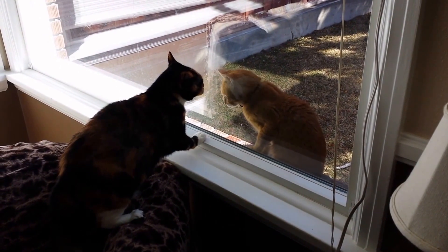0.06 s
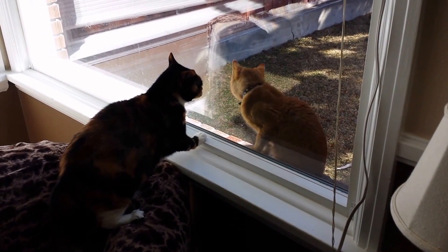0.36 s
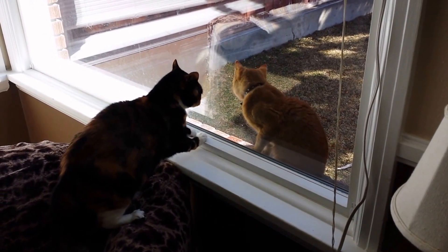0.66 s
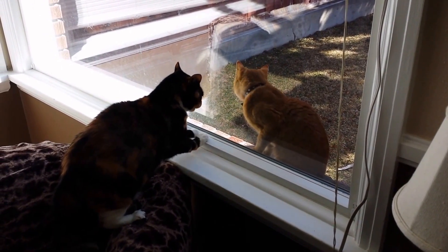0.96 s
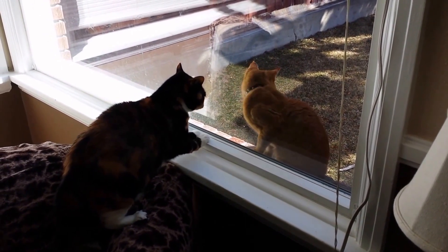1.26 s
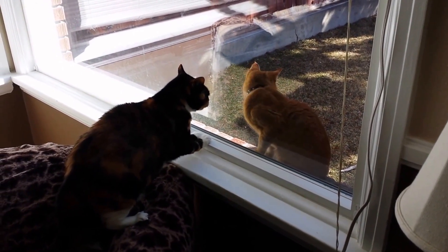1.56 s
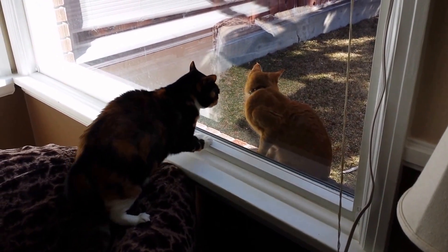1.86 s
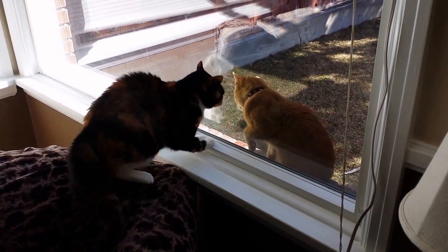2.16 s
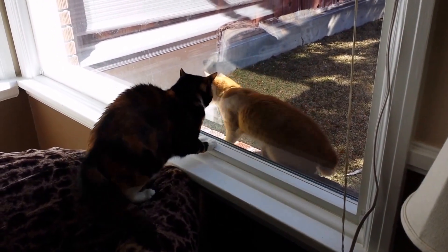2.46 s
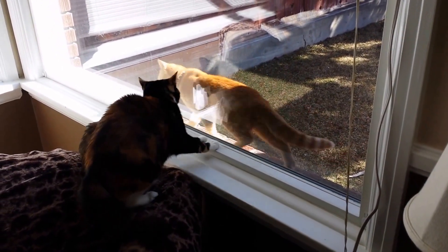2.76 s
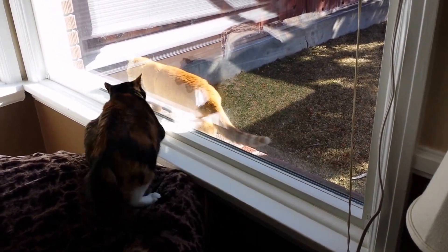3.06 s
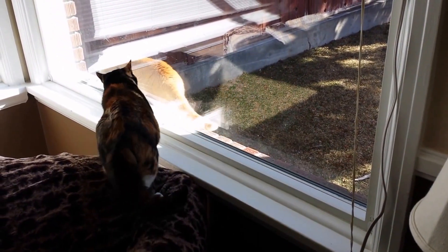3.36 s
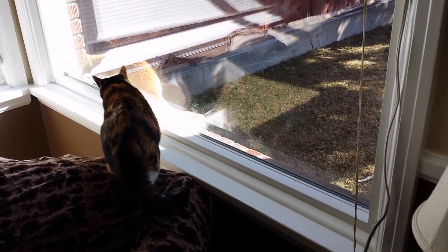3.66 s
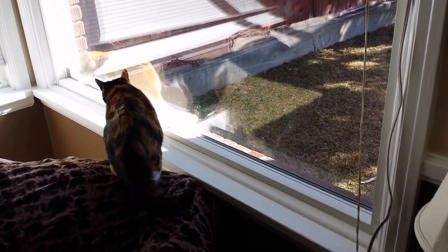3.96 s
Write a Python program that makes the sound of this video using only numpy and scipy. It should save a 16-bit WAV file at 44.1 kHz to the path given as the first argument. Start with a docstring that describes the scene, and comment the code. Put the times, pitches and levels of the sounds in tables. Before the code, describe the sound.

A cat growls low, then suddenly spits and hisses in a quiet room.

```python
"""On a window sill in a small room, a cat growls at another cat outside, shifts, then spits and hisses.
The growl is vocal-fold vibration with two strong harmonics, clean or ragged by turns. The spit is a
volley of pops as the tongue lets go; the hiss is turbulent air rushing through the open mouth.
Claws tick, paws bump and fur brushes a cushion, over room hiss, mains hum and a faint electronic whine."""
import sys
import numpy as np
from scipy import signal
from scipy.fft import rfft, irfft
from scipy.io import wavfile

SR = 44100
rng = np.random.default_rng(int(sys.argv[2]) if len(sys.argv) > 2 else 0)


def persist_wave(psi):
    """Save psi, clipped to +-1, as 16-bit WAV."""
    counts = np.round(np.clip(psi, -1, 1) * 32767).astype(np.int16)
    wavfile.write(sys.argv[1], SR, np.atleast_2d(counts).T)


N = 176400
T = np.arange(N) / SR

# stereo coherence of airy sounds: frequency_hz, coherence
AIR_COHERENCE = [(100, 1), (800, 1), (1100, 1), (2600, .15), (4000, 0.44), (4500, 1), (5400, 0.57),
                 (6400, 0.29), (8000, .35), (14000, .15)]
# their level difference: frequency_hz, left_minus_right_db
AIR_BALANCE = [(100, 0), (400, -1), (800, 3.5), (1400, 4.5), (2400, 0), (4200, -1), (5600, 4), (7500, -4),
               (9000, 0), (10500, -8.5), (14000, -8)]
# their phase difference: frequency_hz, left_lead_rad
AIR_LEAD = [(850, -0.36), (1300, -1.7), (2400, -2.3), (3500, 0.6), (4500, -0.96), (5600, -1.9),
            (6800, -2.5), (8000, -2.5), (9000, -2.5)]
# stereo coherence of room hiss and growl rasp: frequency_hz, coherence
DIFFUSE_COHERENCE = [(30, 0.77), (300, 0.81), (1000, 0.17), (3000, 0.067), (14000, 0.033)]


def growl():
    """Vocal folds oscillate behind a closed mouth; jitter, shimmer and throbbing make the tone rough."""
    # vibration rate of the folds: time_s, pitch_hz
    pitch = [(0, 303.2), (.1, 293.1), (.17, 312.7), (.22, 336.8), (.3, 316), (.36, 305), (.39, 277.4),
             (.44, 266.4), (.47, 240.7), (.5, 222.2), (.545, 203.7), (.6, 214.4), (.65, 216), (.72, 231.5),
             (.77, 225), (.82, 215.3), (.87, 227.1), (.91, 244.4), (.95, 256.3), (1.05, 261.3),
             (1.09, 243.3), (1.115, 204.6), (1.135, 172.9)]
    # irregularity of the cycles: time_s, roughness (0 to 1)
    roughness = [(0, .2), (.15, .24), (.22, .9), (.29, .4), (.41, .55), (.47, .2), (.53, .14), (.6, .19),
                 (.72, .17), (.86, .18), (.95, .5), (1.04, .35), (1.11, .25), (1.14, .5)]
    # strength of the voice: time_s, fundamental_db, second_harmonic_db
    effort = [(0, -43, -48.5), (.045, -41, -45), (.085, -56, -50.5), (.12, -49, -45), (.145, -42, -50),
              (.18, -48, -54), (.215, -41.5, -68), (.25, -50, -55), (.28, -39.5, -54), (.35, -47, -52.5),
              (.4, -41, -51.5), (.44, -40.5, -52.5), (.48, -36, -36), (.53, -33, -31.5), (.59, -35, -32),
              (.625, -38, -36), (.66, -48, -35), (.69, -32, -34.5), (.745, -36, -37.5), (.77, -39, -30),
              (.79, -33.5, -40.5), (.82, -38, -31), (.885, -34, -39.5), (.915, -43.5, -43.5),
              (.945, -35, -49), (.97, -47.5, -51.5), (1.02, -41.5, -43.5), (1.055, -47, -44.5),
              (1.075, -44, -50.5), (1.11, -40, -41), (1.135, -47.5, -57.5)]
    # weak upper partials: harmonic_number, level_db (relative to the second harmonic)
    overtones = [(3, -22), (4, -35.5), (5, -61), (7, -44)]
    # air in the voice: frequency_hz, density_db
    rasp_spectrum = [(60, -30), (120, -29), (170, -19), (290, -11), (385, 6.5), (520, 3), (720, -11),
                     (860, -22), (1200, -17), (1700, -42), (4000, -44)]
    # breath through the nose: time_s, level_db
    nose_level = [(0, -75), (.17, -65.5), (.22, -59), (.33, -70), (.46, -72), (.56, -58.5), (.66, -53.5),
                  (.78, -58), (.9, -58), (1.05, -60), (1.18, -62.5), (1.25, -69), (1.32, -120)]
    # its spectrum: frequency_hz, density_db
    nose_spectrum = [(500, 1), (1050, -1.5), (1300, -4), (1490, 5.5), (1680, -9), (1900, -9), (2300, -6),
                     (3300, -13.5), (3900, -7), (4800, -18), (5450, -7.5), (7300, -13), (10000, -24),
                     (14500, -35)]
    jitter, shimmer, shimmer_hz = .045, 0.84, 73
    throb_hz, throb_depth, release_db_per_s = 52.24, 0.93, 183
    rough = np.clip(curve(roughness), 0, 1)
    phase = running_phase(curve(pitch) * (1 + jitter * rough * wander(hz=110)))
    throb_phase = running_phase(throb_hz * (1 + 0.288 * wander(hz=24.9)))
    throb = 1 + throb_depth * rough * np.sin(throb_phase)
    gate = throb * amp(-release_db_per_s * np.maximum(T - effort[-1][0], 0))
    first, second = amp(curve(effort)), amp(curve(effort, column=2))
    harmonics = [(1, first), (2, second)] + [(round(k), second * amp(db)) for k, db in overtones]
    shared_flutter, voice = wander(shimmer_hz), np.zeros(N)
    for k, level in harmonics:
        # complex flutter disturbs both amplitude and phase
        flutter = 0.6 * shared_flutter + 0.67 * (wander(shimmer_hz) + 1j * wander(shimmer_hz))
        modulation = 1 - rough ** 2 / 2 + shimmer * rough * flutter
        voice += level * (np.exp(1j * k * phase) * modulation).imag
    rasp_gain = amp(-9) * np.hypot(first, second) * gate * (0.36 + rough)
    rasp = noise(rasp_spectrum, DIFFUSE_COHERENCE) * rasp_gain
    breath = noise(nose_spectrum) * amp(curve(nose_level)) * (1 + 0.25 * np.cos(phase))
    return room(gate * np.sqrt(2) * voice * amp([[.2], [-.1]]) + rasp + breath, wet_db=-11)


def hiss():
    """Turbulent airflow excites resonances of the throat and open mouth; the throat band flutters."""
    # relative levels of three noise bands: time_s, treble_db, throat_db, middle_db
    levels = [(2.84, -77, -73, -82), (2.88, -56, -74, -69), (2.905, -52.5, -79, -50), (2.93, -50, -54, -61),
              (2.965, -44.5, -61, -48.5), (3.02, -48.5, -61, -53.5), (3.065, -45, -48, -49),
              (3.15, -40.5, -43.5, -46), (3.29, -38, -40, -44), (3.32, -38, -44.5, -44.5),
              (3.455, -38.5, -53, -44.5), (3.51, -52, -59.5, -55), (3.56, -61, -71, -68),
              (3.62, -81, -92, -93)]
    # spectra of those bands: frequency_hz, density_db
    treble_spectrum = [(2500, -32), (3300, -15.5), (4700, -11.5), (5100, -6), (5380, 4), (5800, 4),
                       (6150, 1), (6600, 0.5), (7100, -3.5), (8100, -4.5), (8800, -11.5), (10000, -18),
                       (12300, -22.5), (14500, -50)]
    throat_spectrum = [(70, -71), (170, -15.5), (290, -6.5), (400, 2.5), (460, -2), (570, -5.5),
                       (740, -3.5), (870, -2.5), (960, -17), (1500, -34)]
    middle_spectrum = [(600, -5), (1000, -1), (1500, 2), (1900, -0.5), (2300, -3.5), (3100, -5.5),
                       (4000, -2.5), (6000, -26)]
    # mouth resonance, rising as the lips draw back: time_s, centre_hz
    formant = [(2.87, 3750), (3.0, 3850), (3.25, 4050), (3.46, 4250)]
    throat_hz = 446.5
    mouth, hum = noise([(1000, 0), (10000, 0)]), noise(throat_spectrum)
    for _ in range(2):  # two passes steepen the resonances
        mouth = resonate(mouth, curve(formant), width_hz=520)
        hum = resonate(hum, np.full(N, throat_hz), width_hz=70)
    treble = (noise(treble_spectrum) + amp(-11) * unit(mouth)) * amp(curve(levels) + 1)
    throat = noise(throat_spectrum) + amp(-3.5) * unit(hum)
    throat *= amp(curve(levels, column=2) - 1.5 + 1.3 * wander(hz=59.1))
    middle = noise(middle_spectrum) * amp(curve(levels, column=3) + 1.5)
    return room((treble + throat + middle) * amp(-2 + 0.34 * wander(hz=150)), wet_db=-5.5)


def spit():
    """Plosive release: the tongue lets go in a volley of wet pops, each a low puff and a bright spray."""
    # the pops: start_s, puff_db, spray_db
    volley = [(2.898, -37.5, -39), (2.907, -28.5, -38), (2.9104, -37, -21), (2.9135, -35.5, -25.5),
              (2.915, -54, -25.5), (2.9204, -28, -23.5)]
    # spectra of their two parts: frequency_hz, density_db
    puff_spectrum = [(100, -40), (330, -9), (600, -11), (900, 11.5), (1150, -3.5), (1550, 2), (2100, -20),
                     (4000, -6), (9000, -47)]
    spray_spectrum = [(800, -21.5), (2400, -0.5), (3700, -15.5), (4500, -17), (5200, 3.5), (6500, -0.5),
                      (7300, -1.5), (7800, -5), (8400, -22), (11000, -35), (15000, -40)]
    puff = sum(amp(db) * burst(start, decay_s=0.0026) for start, db, _ in volley)
    spray = sum(amp(db) * burst(start, decay_s=0.0013) for start, _, db in volley)
    # saturation evens out the noise peaks, so each pop is dense
    pops = puff * np.tanh(noise(puff_spectrum)) + spray * np.tanh(noise(spray_spectrum))
    lowpass = signal.butter(4, 10700, fs=SR, output="sos")
    return room(signal.sosfilt(lowpass, pops), wet_db=-3)


def claw_ticks():
    """Stick and slip: a claw catches and lets go, giving a few bright, gritty cycles."""
    # the ticks: centre_s, level_db, ring_hz
    ticks = [(1.1878, -37.5, 5800), (1.197, -46, 6455), (1.2115, -50, 6340), (1.608, -54.5, 4000),
             (1.681, -55.5, 3600), (1.685, -43, 5600), (1.728, -45.5, 5400), (2.031, -25, 4820),
             (2.037, -50, 5500), (2.046, -44, 4460), (2.056, -40.5, 5430), (2.597, -55, 5100),
             (2.605, -54, 5050), (2.612, -51.5, 3550), (3.722, -53, 6500)]
    # their grit: frequency_hz, density_db
    grit_spectrum = [(1000, -22), (3400, -7.5), (4200, -3), (6400, 2.5), (7800, -12.5), (9500, -27.5),
                     (14500, -26)]
    width_s = 0.00051
    grit = 0.48 * noise(grit_spectrum)[0]
    out = np.zeros(N)
    for centre, db, hz in ticks:
        gaussian = np.exp(-np.minimum(((T - centre) / width_s) ** 2, 50))
        out += amp(db) * gaussian * (np.sin(2 * np.pi * hz * (T - centre)) + grit)
    return room(out * amp([[2], [-2.5]]), wet_db=1)


def paws_and_fur():
    """Damped impacts of paws on the sill, and friction noise of fur on the cushion."""
    # soft impacts: start_s, level_db
    impacts = [(0.198, -52.5), (2.032, -55.5), (2.042, -55), (2.058, -48), (2.188, -51.5), (2.611, -72),
               (2.646, -57), (2.679, -56.5)]
    # rustle as the cat shifts: time_s, relative_level_db
    rustle_level = [(1.58, -95.5), (1.64, -63.5), (1.69, -62), (1.745, -57.5), (1.79, -63), (1.86, -65.5),
                    (1.97, -74.5), (2.02, -73), (2.1, -63.5), (2.2, -72.5), (2.32, -87), (2.56, -78),
                    (2.61, -64), (2.66, -84), (2.76, -80), (3.5, -66), (3.6, -69.5), (3.68, -72.5),
                    (3.8, -69.5), (3.88, -64.5), (3.96, -64.5), (4, -69.5)]
    # spectra of impact and rustle: frequency_hz, density_db
    paw_spectrum = [(80, 2), (180, 4), (400, -10), (700, -1.5), (1000, -5), (1500, -5.5), (2100, -6.5),
                    (2700, -10.5), (4000, -12), (9000, -21)]
    fur_spectrum = [(200, 3.5), (850, -2), (1300, 6), (1550, 2), (1950, 2.5), (2400, 3), (2750, -3.5),
                    (3600, -4), (4800, -3.5), (5400, 3), (6700, -2), (8200, -3), (9500, -9), (14500, -20)]
    bumps = noise(paw_spectrum) * sum(amp(db) * burst(start, decay_s=0.0067) for start, db in impacts)
    return room(bumps, wet_db=0) + noise(fur_spectrum) * amp(curve(rustle_level) + 3 + wander(hz=118.9))


def background():
    """Broadband room hiss and the line spectra of mains hum and electronic whine swell and sink as one."""
    # room hiss: frequency_hz, density_db
    air_spectrum = [(20, 6), (45, -9), (65, 28), (100, 17), (170, 20.5), (250, 23), (400, 13.5), (750, 11),
                    (1200, 4.5), (2500, 1.5), (4500, 1.5), (6500, 4.5), (10000, 0), (14500, 2)]
    # envelope common to all three: time_s, level_db
    level = [(0, -53.5), (1.09, -53.5), (1.36, -64), (2.0, -62.5), (2.86, -62.5), (3.1, -55.5),
             (3.52, -57.5), (3.68, -62), (4, -61)]
    # mains hum: frequency_hz, relative_level_db
    hum_lines = [(62, -17), (120, -14), (241, -7.5), (360, -11.5)]
    # whine: harmonic_number, relative_level_db
    whine_lines = [(4, -14), (5, -16), (6, -19.5), (7, -22.5), (8, -26), (9, -57)]
    whine_hz, whine_end_s = 1512.7, 2.92
    hum = sum(amp(db) * np.sin(2 * np.pi * hz * T + 0.53 * wander(hz=1.3)) for hz, db in hum_lines)
    whine = np.zeros(N)
    for k, db in whine_lines:
        phase = 2 * np.pi * (round(k) * whine_hz * T + rng.random())
        whine += amp(db) * np.sin(phase + 0.81 * wander(hz=30.8))
    whine = whine * np.clip((whine_end_s - T) / .05, 0, 1) * amp([[-1], [1]])
    air = noise(air_spectrum, DIFFUSE_COHERENCE,
                balance=[(100, 0.92), (2000, -1.4), (12000, -6.4)], lead=[(1000, 0)])
    return amp(curve(level)) * (amp(-1.5) * air + np.sqrt(2) * (hum + whine))


def room(x, wet_db):
    """Reverberation: dense reflections, strongest early, with each band decaying at its own rate."""
    # reverberation time: frequency_hz, t60_s
    decay_times = [(200, 0.54), (1000, 0.34), (5000, 0.33), (12000, 0.27)]
    size, early_s, early_gain = SR // 2, 0.013, 2.4
    reflections = rng.choice([-1., 1.], (2, size)) * (rng.random((2, size)) < .15)
    hz, t, bands = signal.stft(reflections, SR, nperseg=256)
    decay = amp(-60 * t / spectrum_at(decay_times, hz)[:, None])
    tail = signal.istft(bands * decay, SR, nperseg=256)[1][:, :size]
    tail *= (T[:size] > .003) * (1 + early_gain * np.exp(-T[:size] / early_s))
    return x + amp(wet_db) * signal.fftconvolve(x, tail / np.linalg.norm(tail[0]), axes=1)[:, :N]


def noise(spectrum, coherence=AIR_COHERENCE, balance=AIR_BALANCE, lead=AIR_LEAD):
    """Partially coherent stereo noise of rms 1, with level and phase differences between the sides."""
    hz = np.fft.rfftfreq(N, 1 / SR)
    common, independent = rfft(rng.standard_normal((2, N)))
    likeness = np.clip(spectrum_at(coherence, hz), -1, 1)
    tilt = amp(spectrum_at(balance, hz) / 2) * np.exp(.5j * spectrum_at(lead, hz))
    left = common * tilt
    right = (likeness * common + np.sqrt(1 - likeness ** 2) * independent) / tilt
    return unit(irfft(np.array([left, right]) * amp(spectrum_at(spectrum, hz)), N))


def resonate(x, hz, width_hz):
    """A damped resonator whose centre frequency follows the curve hz."""
    carrier = np.exp(1j * running_phase(hz))
    pole = np.exp(-np.pi * width_hz / SR)
    return 2 * (carrier * signal.lfilter([1 - pole], [1, -pole], x / carrier)).real


def burst(start_s, decay_s):
    """Sudden onset, exponential decay."""
    return (T >= start_s) * np.exp(-np.clip((T - start_s) / decay_s, 0, 50))


def wander(hz):
    """Random fluctuation of rms 1, low-passed at hz."""
    f = np.fft.rfftfreq(N, 1 / SR)
    return unit(irfft(rfft(rng.standard_normal(N)) / (1 + (f / hz) ** 4), N))


def running_phase(hz):
    """Phase in radians as the integral of frequency."""
    return 2 * np.pi * np.cumsum(hz) / SR


def curve(rows, column=1):
    """One column of a time table, interpolated at every sample."""
    rows = np.array(rows)
    return np.interp(T, rows[:, 0], rows[:, column])


def spectrum_at(points, hz):
    """A frequency table, interpolated on a logarithmic axis."""
    f, value = np.transpose(points)
    return np.interp(np.log(hz + 1), np.log(f + 1), value)


def amp(db):
    """Decibels to amplitude ratio."""
    return 10 ** (np.asarray(db) / 20)


def unit(x):
    """Normalises to rms 1."""
    return x / np.sqrt(np.mean(x ** 2) + 1e-20)


def scene():
    """Superposition of all sources in the room."""
    return growl() + hiss() + spit() + claw_ticks() + paws_and_fur() + background()


def record(dry):
    """Band limiting: a steep linear-phase low-pass removes the highest treble."""
    cutoff_hz = 14580
    lowpass = signal.firwin(511, cutoff_hz, window=("kaiser", 9), fs=SR)
    return signal.oaconvolve(dry, lowpass[None], "same")


dry = scene()
out = record(dry)
persist_wave(out)
```